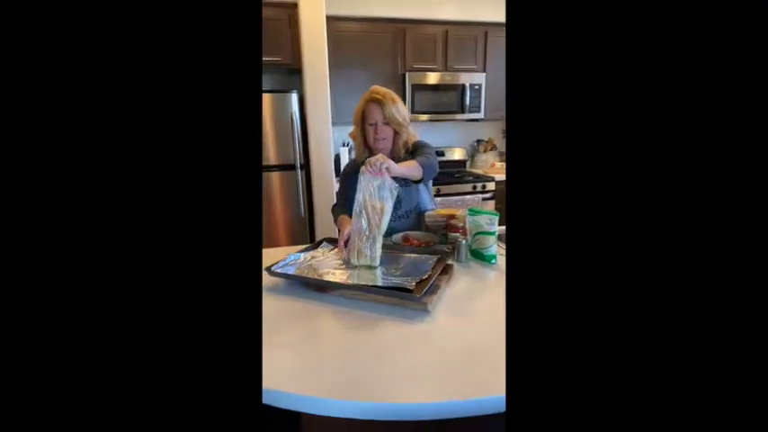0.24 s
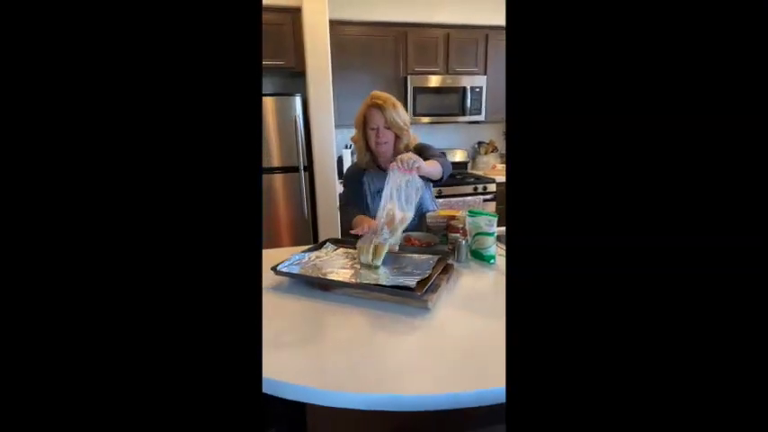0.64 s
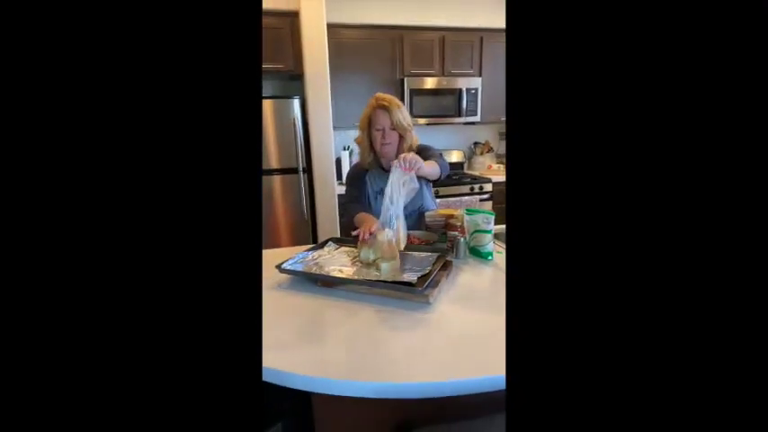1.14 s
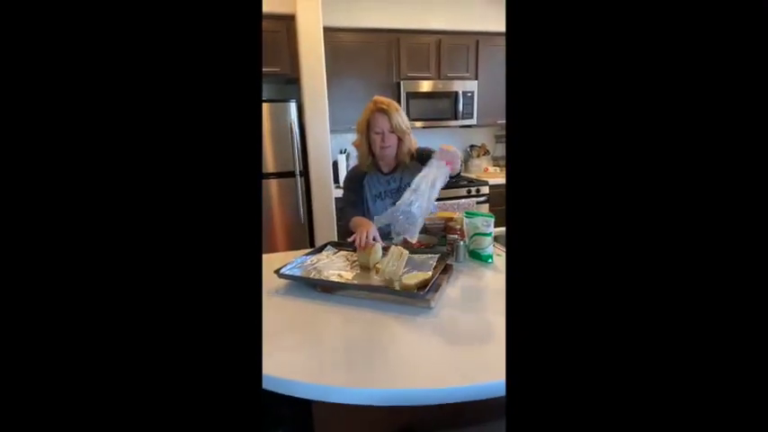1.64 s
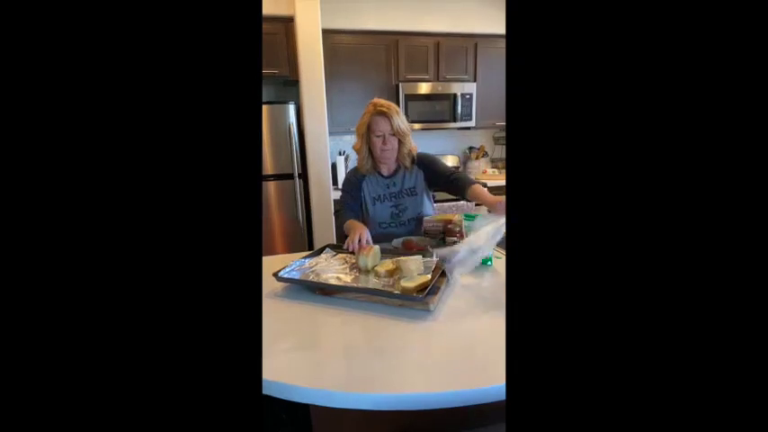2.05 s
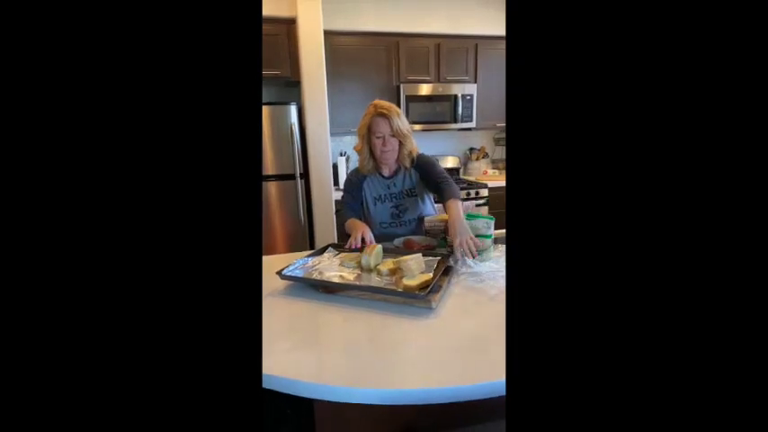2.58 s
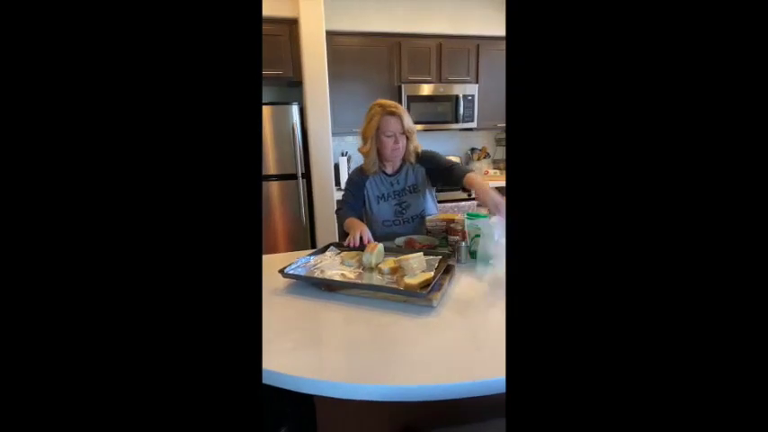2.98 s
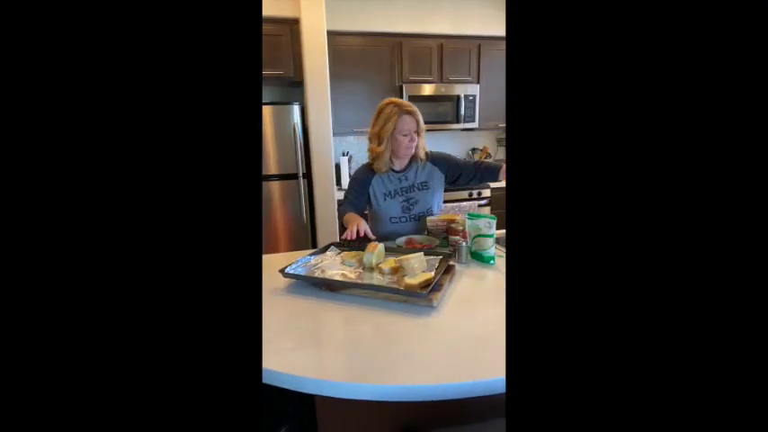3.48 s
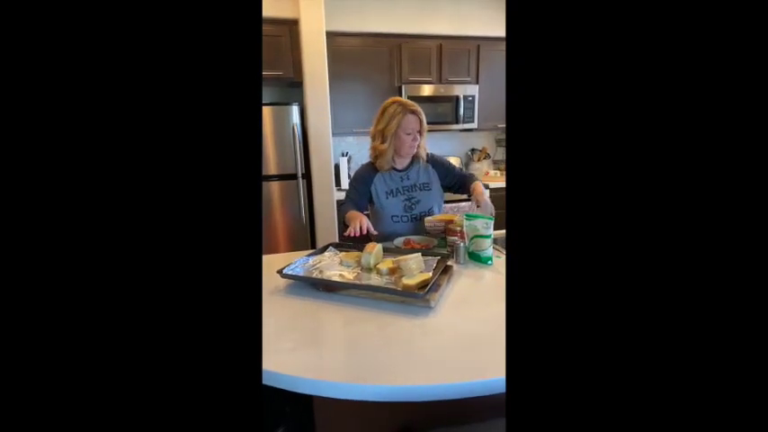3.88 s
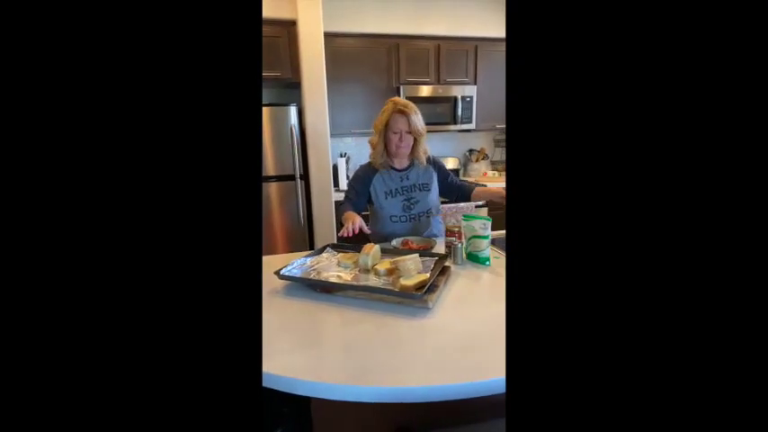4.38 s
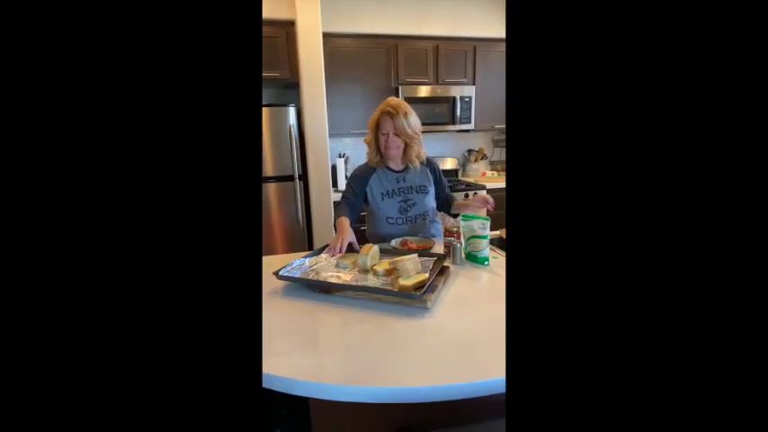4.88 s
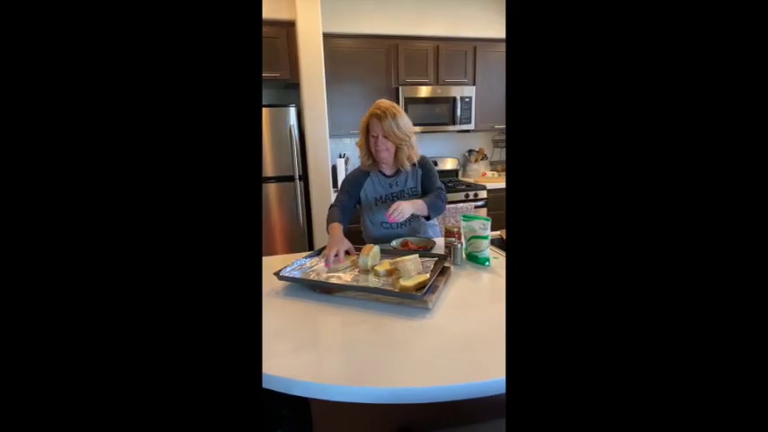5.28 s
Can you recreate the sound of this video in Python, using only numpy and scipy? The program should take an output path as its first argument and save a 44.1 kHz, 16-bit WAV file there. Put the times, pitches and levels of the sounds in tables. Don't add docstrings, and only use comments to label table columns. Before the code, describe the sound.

Dense plastic crinkling and scraping open the scene, with dull bumps shaking a baking sheet and worktop. Rustling thins out around a hard, dry knock near the middle; a quieter stretch holds faint ticks and a light jar-like rattle. Late on, a low hollow pan knock bounces and settles, followed by soft foil rustle. Small reflective kitchen, steady fridge hum, phone microphone at a slight distance with clipped treble.

```python
import sys
import numpy as np
from scipy import signal
from scipy.fft import rfft, irfft
from scipy.io import wavfile
from scipy.ndimage import uniform_filter1d

SR = 44100
rng = np.random.default_rng(int(sys.argv[2]) if len(sys.argv) > 2 else 0)


def gain_from_db(level_db):
    decades = np.asarray(level_db, float) / 20
    return 10 ** decades


def unload_audio(sound):
    columns = np.transpose(np.atleast_2d(sound))
    steps = np.round(np.clip(columns, -1, 1) * 32767)
    wavfile.write(sys.argv[1], SR, steps.astype(np.int16))


N = 243873
T = np.arange(N) / SR

# (frequency [Hz], width [Hz], level [dB])
SHEET_MODES = [(60.2, 12, -22.5), (110.7, 22, -1.5), (123.5, 23, 4), (164, 24.2, 1.5), (199, 21.8, 0.5),
               (268.6, 38, -0.5), (376, 23, -13)]
# (frequency [Hz], density [dB per Hz])
CRACKLE_SPECTRUM = [(300, -34), (1200, 1), (2500, 4.5), (4500, 7.5), (7000, 7), (9000, 1), (11500, -0.5),
                    (13000, -39)]
# (start [s], hold [s], rumble level [dB])
ROLL_LANDINGS = [(.044, 0.069, -33.5), (.33, 0.029, -53), (.464, .02, -38.5), (0.572, 0.028, -39),
                 (0.856, 0.057, -41), (1.389, 0.012, -36), (1.519, 0.01, -37), (1.651, 0.027, -40.5),
                 (2.053, 0.012, -38.5), (2.598, 0.056, -43), (4.641, 0.0058, -45), (4.744, .01, -37),
                 (4.804, 0.01, -39), (4.881, 0.081, -45), (5.049, 0.067, -59.5)]


def noise(size=N):
    return rng.standard_normal(size)


def unit(x):
    return x / np.sqrt(np.mean(x ** 2))


def curve(rows, k, off=None):
    rows = np.array(rows)
    return np.interp(T, rows[:, 0], rows[:, k], off, off)


def at_hz(points, size=N):
    hz, value = np.transpose(points)
    return np.interp(np.log(np.fft.rfftfreq(size, 1 / SR) + 1), np.log(hz), value)


def colour(x, points):
    return irfft(rfft(x) * gain_from_db(at_hz(points, len(x))), len(x))


def ring(x, modes):
    out = 0
    for k, (hz, width, db) in enumerate(modes):
        radius = np.exp(-np.pi * width / SR)
        angle = 2 * np.pi * hz / SR
        feedback = [1, -2 * radius * np.cos(angle), radius * radius]
        out = out + (-1) ** k * gain_from_db(db) * signal.lfilter([0, np.sin(angle)], feedback, x)
    return out


def clicks(per_s, scatter_db):
    chance = rng.random((3, N))
    happens = chance[0] < per_s / SR
    return happens * np.sign(chance[1] - .5) * gain_from_db(-scatter_db * np.log(chance[2] + 1e-4))


def walk(per_s):
    k = int(SR / per_s)
    steps = np.repeat(noise(N // k + 1), k)
    return unit(uniform_filter1d(uniform_filter1d(steps, k), k)[:N])


def add(out, s, sound):
    i = int(s * SR)
    out[i:i + len(sound)] += sound[:N - i]


def effort(rows, slopes, axis=2):
    rise, fall = slopes
    power = 0
    for row in rows:
        start, hold = row[:2]
        db = row[axis] - rise * np.maximum(start - T, 0) - fall * np.maximum(T - start - hold, 0)
        power = power + gain_from_db(2 * db)
    return np.sqrt(power)


def bag():
    # (start [s], hold [s], crackle [dB], scrape [dB])
    tugs = [(0.0, 0.12, -38.5, -46), (.27, 0.053, -43, -53.5), (.4, 0.12, -51, -57),
            (.6, 0.055, -49.5, -56.5), (.69, 0.014, -43, -57), (.78, .05, -44.5, -48.5),
            (.85, .08, -41.5, -43), (1.07, 0.049, -42.5, -57), (1.18, 0.054, -51, -66),
            (1.35, 0.081, -52.5, -52), (1.45, 0.036, -42, -46.5), (1.6, 0.025, -47.5, -57),
            (1.67, 0.027, -43, -42), (1.88, 0.12, -55, -60), (2.06, 0.13, -53, -57.5),
            (2.39, 0.015, -51, -52.5), (2.66, 0.082, -49.5, -50), (2.86, 0.13, -53, -58.5),
            (3.02, 0.017, -52, -66), (3.25, 0.027, -58, -75), (3.65, 0.0092, -60.5, -83),
            (3.8, 0.082, -50.5, -53.5), (3.98, 0.028, -48.5, -57), (4.09, 0.076, -49, -53.5),
            (4.62, 0.026, -63, -51), (4.68, .03, -41, -45.5), (4.72, .04, -43, -37),
            (4.86, 0.021, -51.5, -42.5), (5.18, 0.087, -77, -60.5), (5.36, 0.051, -81, -52)]
    # (swell [dB/s], decay [dB/s])
    tug_slopes = (560, 127)
    # (frequency [Hz], density [dB per Hz])
    scrape_spectrum = [(200, 8.5), (450, 15), (800, 18), (1400, 4), (2500, -21)]
    # (time [s], peak level [dB])
    snaps = [(0.0372, -23), (0.2773, -28), (0.5614, -29), (1.0804, -44), (1.3522, -32), (1.3794, -26.5),
             (1.4487, -25.5), (1.6822, -22), (1.8927, -42), (2.0443, -27.5), (2.3264, -34), (2.388, -32),
             (2.593, -17), (2.8518, -37.5), (2.9514, -47), (3.365, -43.5), (3.448, -45), (3.56, -46.5),
             (3.6052, -79), (3.6477, -46), (3.7858, -34.5), (3.944, -57), (4.0718, -34.5), (4.4363, -43),
             (4.611, -40.5), (4.6731, -45), (5.446, -39)]
    flutter = gain_from_db(1.5 * np.array([walk(40.), walk(30.)]))
    folds = clicks(per_s=2200., scatter_db=2.3)
    crackle = unit(colour(folds, CRACKLE_SPECTRUM)) * gain_from_db(-2.5) * effort(tugs, tug_slopes)
    grains = clicks(per_s=700., scatter_db=1.5)
    scrape = unit(colour(grains, scrape_spectrum)) * gain_from_db(-3.5) * effort(tugs, tug_slopes, axis=3)
    out = crackle * flutter[0] + scrape * flutter[1]
    t = T[:2048]
    decay = np.exp(-t / 0.012) + 0.79 * np.exp(-t / 0.0013)
    for s, db in snaps:
        add(out, s, gain_from_db(db - 13.5) * unit(colour(noise(2048), CRACKLE_SPECTRUM)) * decay)
    return out


def tumble():
    # (swell [dB/s], decay [dB/s])
    roll_slopes = (500, 166)
    bumps = unit(ring(clicks(per_s=220., scatter_db=1.5), SHEET_MODES))
    bumps = bumps / np.sqrt(0.13 + uniform_filter1d(bumps ** 2, size=1300))
    return bumps * effort(ROLL_LANDINGS, roll_slopes)


def counter():
    # (frequency [Hz], width [Hz], level [dB])
    worktop_modes = [(61, 3.1, -14), (117.3, 8.5, 2.5), (135, 37, -0.5)]
    force = np.zeros(N)
    for s, _, db in ROLL_LANDINGS:
        add(force, s, gain_from_db(db - 0.5) * np.hanning(132) / 66)
    return ring(force, worktop_modes)


def taps():
    # (time [s], peak level [dB], ring [Hz], T60 [s], thump relative level [dB])
    tap_events = [(0.037, -20, 598, 0.048, -15), (0.094, -35, 496, 0.17, 7), (0.564, -40.5, 943, 0.15, -14),
                  (0.714, -37.5, 1430, 0.071, -23), (0.909, -25, 853, 0.064, -8),
                  (1.379, -30.5, 760, 0.029, 6.5), (1.445, -37, 773, 0.045, -8),
                  (1.489, -36, 790, 0.018, 8.5), (1.643, -23.5, 558, 0.022, 5.5),
                  (1.692, -22.5, 413, 0.073, -8), (2.042, -25.5, 1140, 0.025, -23),
                  (2.387, -40, 1390, 0.064, -13), (3.785, -42.5, 1144, 0.22, -14),
                  (4.072, -35.5, 765, 0.076, -18), (4.611, -36, 807, 0.094, -1),
                  (4.869, -42, 456, 0.09, -3)]
    out, blows = np.zeros(N), np.zeros(N)
    t = T[:8192]
    onset = 1 - np.exp(-t / 0.00054)
    for s, db, hz, t60, thump_db in tap_events:
        detune, phase = rng.random((2, 8, 1))
        octaves = np.linspace(-.6, 1.3, num=8)[:, None] + 0.23 * (detune - .5)
        ratio = 2 ** octaves
        decay = np.exp(-np.log(1000) * t * ratio / t60)
        tones = np.sin(2 * np.pi * (hz * ratio * t + phase)) * decay
        cluster = (tones / (ratio + 1 / ratio)).sum(0)
        add(out, s, gain_from_db(db - 5.0) * cluster * onset)
        add(blows, s + .004, gain_from_db(db + thump_db - 14.0) * np.hanning(66) / 33)
    return out + gain_from_db(6.0) * ring(blows, SHEET_MODES)


def knock(hits, modes, contact_s, chatter_db, chatter_s, crack_db, crack_s, low_hz):
    force, crack = np.zeros(N), np.zeros(N)
    t = T[:4096]
    push = t / contact_s * np.exp(-t / contact_s) / (contact_s * SR)
    for s, db in hits:
        rattle = noise(4096) * np.exp(-t / chatter_s)
        chatter = gain_from_db(chatter_db) * np.convolve(rattle, push[:256])[:4096]
        add(force, s, gain_from_db(db) * (push + chatter))
        burst = unit(colour(noise(4096), CRACKLE_SPECTRUM)) * np.exp(-t / crack_s)
        add(crack, s, gain_from_db(db + crack_db) * burst)
    radiation = signal.butter(2, low_hz, "highpass", fs=SR, output="sos")
    return signal.sosfilt(radiation, gain_from_db(5.0) * ring(force, modes)) + crack


def lid_knock():
    # (time [s], level [dB])
    lid_hits = [
        (2.589, -24.5),
        (2.5915, -15),
        (2.596, -19),
        (2.601, -31.5),
        (2.6115, -23),
    ]
    # (frequency [Hz], width [Hz], level [dB])
    lid_modes = [(556, 175, 0.5), (727, 410, 1.5), (1080, 225, -3.5), (1880, 570, -3), (4300, 120, -22),
                 (6070, 350, -11), (7060, 95, -27)]
    return knock(lid_hits, lid_modes, contact_s=0.00016, chatter_db=-18.0, chatter_s=0.0058,
                 crack_db=-22.5, crack_s=0.052, low_hz=256.0)


def jar_knock():
    # (time [s], level [dB])
    jar_hits = [
        (3.941, -36.5),
        (3.9435, -31),
        (3.9465, -26),
        (3.957, -29),
        (3.960, -31),
        (3.973, -37.5),
    ]
    # (frequency [Hz], width [Hz], level [dB])
    jar_modes = [(412, 80, -8), (617, 130, -4.5), (990, 105, -4), (1500, 440, -10), (2160, 230, -2),
                 (3000, 500, -2), (4200, 270, -7)]
    return knock(jar_hits, jar_modes, contact_s=0.000052, chatter_db=-19.5, chatter_s=0.015,
                 crack_db=-12.5, crack_s=0.015, low_hz=200.0)


def pan_knock():
    # (time [s], level [dB])
    pan_hits = [
        (4.735, -17.5),
        (4.741, -13),
        (4.772, -26.5),
        (4.81, -25.5),
        (4.855, -28),
    ]
    # (frequency [Hz], width [Hz], level [dB])
    pan_modes = [(63, 31, -23.5), (101.4, 14, -10.5), (139, 58, -5.5), (262, 14.5, -8.5), (392, 31, -4),
                 (456, 60, -2.5), (633, 140, -2.5), (786, 14.4, -10), (1055, 62, -4), (2160, 160, -25)]
    return knock(pan_hits, pan_modes, contact_s=0.00036, chatter_db=-25.0, chatter_s=0.012,
                 crack_db=-30.5, crack_s=0.016, low_hz=63.0)


def rubs():
    # (start [s], length [s], frequency [Hz], width [Hz], level [dB])
    rub_events = [(0.081, .03, 1130, 119, -58), (0.9, 0.096, 760, 200, -53), (1.705, 0.087, 645, 35, -50.5),
                  (4.064, 0.04, 2770, 480, -43.5), (4.105, 0.059, 2720, 710, -48.5),
                  (4.119, 0.037, 1390, 117, -53), (4.716, 0.073, 2000, 1500, -43.5),
                  (4.858, 0.056, 1700, 1500, -47), (4.601, 0.036, 1900, 1200, -53.5)]
    out, grit = np.zeros(N), noise()
    for s, length, hz, width, db in rub_events:
        size = int(length * SR)
        burst = unit(ring(grit[int(s * SR):][:size], [(hz, width, 0)]))
        add(out, s, gain_from_db(db) * burst * signal.windows.tukey(size, .4))
    return out


def foil():
    # (start [s], hold [s], level [dB])
    sweeps = [
        (5.31, 0.025, -61),
        (5.38, .03, -59.5),
        (5.44, 0.061, -45.5),
        (5.49, 0.044, -46.5),
    ]
    # (swell [dB/s], decay [dB/s])
    sweep_slopes = (250, 130)
    # (frequency [Hz], density [dB per Hz])
    hiss_spectrum = [(1200, -13), (2400, -11.5), (4000, -5.5), (5500, 2), (8000, -10), (11500, -11),
                     (13000, -32)]
    creases = clicks(per_s=1700.0, scatter_db=3.0)
    return unit(colour(creases, hiss_spectrum)) * effort(sweeps, sweep_slopes)


def squeak():
    # (time [s], frequency [Hz], level [dB])
    glide = [
        (5.05, 5550, -84),
        (5.1, 5230, -76),
        (5.16, 4930, -71),
        (5.21, 4450, -72),
    ]
    hz = curve(glide, 1) * (1 + .004 * walk(60.))
    return gain_from_db(curve(glide, 2, -140)) * np.sin(2 * np.pi * np.cumsum(hz) / SR)


def room():
    # (frequency [Hz], T60 [s])
    room_t60 = [(100, 0.29), (500, 0.43), (2000, 0.61), (6000, 0.17), (12000, 0.7)]
    size = 32768
    t, tail = T[:size], 0
    for hz, t60 in room_t60:
        share = [(other, 0 if other == hz else -30) for other, _ in room_t60]
        tail = tail + colour(noise(size), share) * np.exp(-np.log(1000) * t / t60)
    build_up = (1 - np.exp(-t / 0.004)) * (1 + 0.5 * np.exp(-t / .02))
    echoes = rfft(tail * build_up)
    flat = echoes / np.sqrt(uniform_filter1d(np.abs(echoes) ** 2, size=30))
    tail = irfft(flat, size)[:size * 3 // 4]
    return tail / np.sqrt(np.sum(tail ** 2))


def kitchen():
    # (frequency [Hz], density [dB per Hz])
    air_spectrum = [(25, -5), (60, 0.5), (350, 0.5), (615, -10), (1110, -6), (2400, -21.5), (7000, -37),
                    (11000, -41.5)]
    # (frequency [Hz], level [dB])
    fridge_hum = [(59.2, -63.5), (123.8, -62), (161.5, -60), (236.9, -63), (355.3, -66), (414.5, -70)]
    swell = gain_from_db(1.0 * walk(5.026))
    takes = [gain_from_db(-52.5) * unit(colour(noise(), air_spectrum)) * swell for _ in range(3)]
    for hz, db in fridge_hum:
        level = gain_from_db(db + 3.0 + 1.0 * walk(6.))
        takes[0] = takes[0] + level * np.sin(2 * np.pi * np.cumsum(hz + .5 * walk(3.)) / SR)
    return takes


def scene():
    # (frequency [Hz], share [0-1])
    alike_share = [(330, .993), (450, .85), (600, .2), (1250, .5), (2500, .2), (4000, .05), (6000, .2),
                   (12000, .3)]
    # (frequency [Hz], left minus right [dB])
    left_gain = [(450, 0), (620, 4), (1300, 2), (2200, 0)]
    # (frequency [Hz], lead of the left port [rad])
    left_lead = [(1000, .05), (1600, .3), (2500, 1.6), (6000, 2.0), (12000, 2.2)]
    paths = [(room(), air) for air in kitchen()]
    handling = gain_from_db(-0.5) * bag() + gain_from_db(-2.5) * tumble() + counter() + taps() + rubs() + foil() + squeak()
    direct = handling + lid_knock() + jar_knock() + pan_knock()
    shared, left, right = (rfft(gain_from_db(-4.5) * signal.fftconvolve(direct, tail)[:N] + air)
                           for tail, air in paths)
    alike = at_hz(alike_share)
    both = gain_from_db(-1.0) * rfft(direct) + np.sqrt(alike) * shared
    own = np.sqrt(1 - alike)
    louder = gain_from_db(at_hz(left_gain) / 2)
    lead = np.exp(.5j * at_hz(left_lead))
    return np.array([irfft(louder * (both * lead + own * left), N),
                     irfft((both / lead + own * right) / louder, N)])


def starve(x, top_hz, spread_hz, faint_db, from_hz, holes, coarse):
    hz, _, z = signal.stft(x, SR, "cosine", 2048, 1024)
    power = np.abs(z[1:]) ** 2
    band = uniform_filter1d(power, size=16, axis=0)[8::16]
    chance = uniform_filter1d(rng.standard_normal((2, *band.shape)), size=2, axis=2) * np.sqrt(2)
    faint = band < gain_from_db(2 * (faint_db + 3.0 * chance[0]))
    dropped = chance[1] > holes + (top_hz - hz[8::16, None]) / 3000
    lost = np.repeat(faint | dropped, 16, axis=0)
    strong = power > coarse * np.repeat(band, 16, axis=0)
    line_hz = hz[1:, None]
    below_top = line_hz < top_hz + spread_hz * chance[0, 0]
    z[1:] *= ((~lost & strong) | (line_hz < from_hz)) & below_top
    return signal.istft(z, SR, "cosine", 2048, 1024)[1][:N]


def roll_off(x):
    return signal.sosfilt(signal.butter(12, 12990, fs=SR, output="sos"), x)


def record(dry):
    # (start [s], length [s], level [dB])
    bright = [(0.006, .04, -5.5), (0.526, 0.04, -5.5), (1.333, 0.03, -6), (1.668, 0.022, -4.5),
              (1.885, 0.034, 8), (2.04, 0.0093, 1.5), (2.311, 0.059, 1), (2.58, .012, 4),
              (2.842, 0.0205, 1.5), (2.951, 0.0046, 11), (3.363, .006, -6), (3.446, 0.0068, 0),
              (3.764, 0.034, -4), (3.915, 0.02, -2), (4.428, 0.0057, 4), (4.604, 0.0075, -2)]
    left, right = signal.sosfilt(signal.butter(2, 35., "highpass", fs=SR, output="sos"), dry)
    mid, side = (left + right) / 2, (left - right) / 2

    def band(low_hz, high_hz):
        return signal.sosfiltfilt(signal.butter(8, [low_hz, high_hz], "bandpass", fs=SR, output="sos"), mid)

    gate = sum(gain_from_db(db) * (T > s) * (T < s + length) for s, length, db in bright)
    treble = gain_from_db(-6.0) * uniform_filter1d(gate, size=88) * band(6400, 12900)
    linger = sum(1. * (T > s + length) * (T < s + length + .027) for s, length, _ in bright if length > .011)
    edge = gain_from_db(-3.0) * uniform_filter1d(linger, size=88) * band(6400, 8100)
    mid = edge + treble + starve(mid, top_hz=6750., spread_hz=330., faint_db=-103.5, from_hz=2200.,
                                 holes=.9, coarse=.35)
    side = starve(side, top_hz=11800., spread_hz=350., faint_db=-104., from_hz=4500., holes=.7, coarse=.2)
    return roll_off(np.array([mid + side, mid - side]))


dry = scene()
out = record(dry)
unload_audio(out)
```